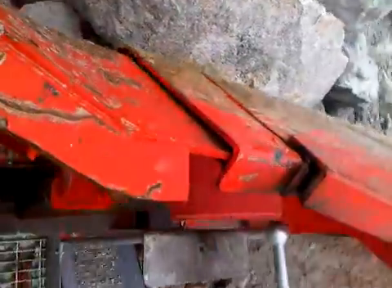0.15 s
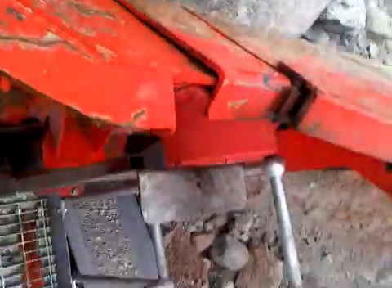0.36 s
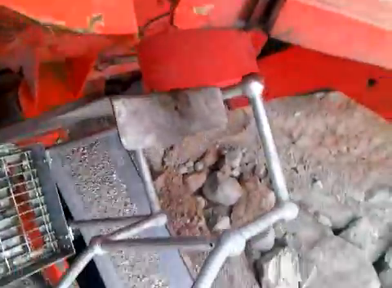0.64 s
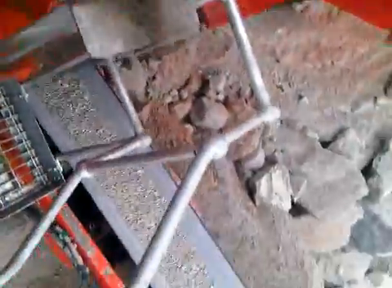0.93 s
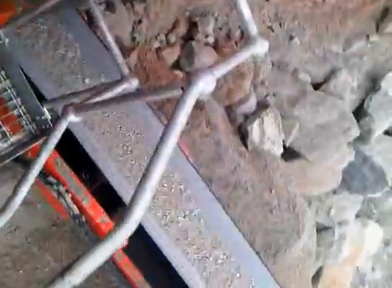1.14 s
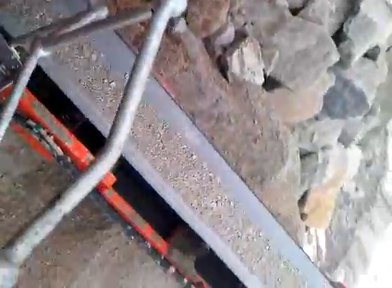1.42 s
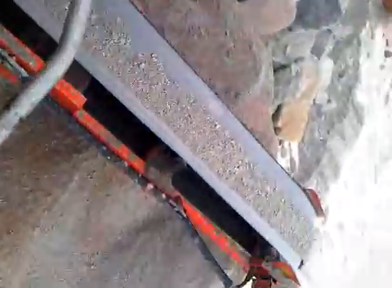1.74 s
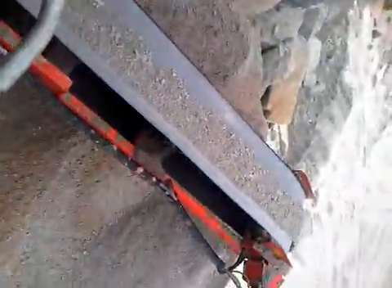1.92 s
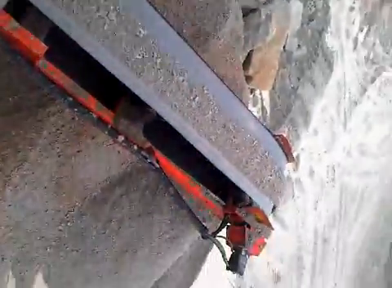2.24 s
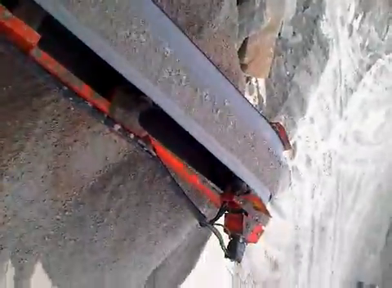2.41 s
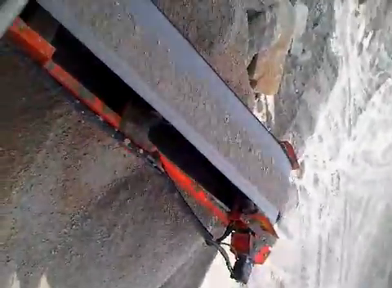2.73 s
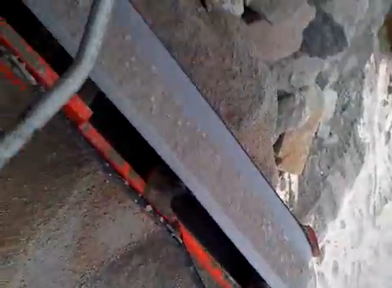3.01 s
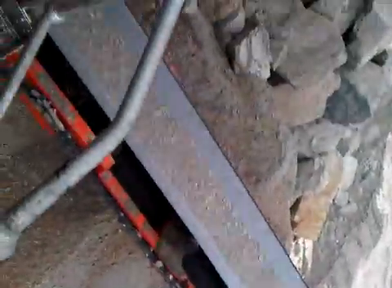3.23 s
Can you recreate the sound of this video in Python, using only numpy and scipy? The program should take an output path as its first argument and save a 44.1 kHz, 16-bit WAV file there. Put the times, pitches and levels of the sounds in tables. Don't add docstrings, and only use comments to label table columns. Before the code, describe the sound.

Loud rock crusher heard from its walkway: crunching blows throughout, strongest early and mid-way, over rough engine drone and belt rattle, which ease slightly as the microphone turns away; dull, clipped, treble-poor sound.

```python
import sys
import numpy as np
from scipy import signal
from scipy.fft import rfft, irfft, next_fast_len
from scipy.io import wavfile
from scipy.ndimage import uniform_filter1d, map_coordinates

SR = 44100
rng = np.random.default_rng(int(sys.argv[2]) if len(sys.argv) > 2 else 0)


def elevation(decibels):
    levels = np.asarray(decibels, float)
    return 10 ** (levels / 20)


def waveform_to_disk(signal):
    frames = np.transpose(np.atleast_2d(signal))
    scaled = np.clip(frames, -1, 1) * 32767
    samples = np.round(scaled).astype(np.int16)
    wavfile.write(sys.argv[1], SR, samples)


N = 148617

# middle in seconds, level in dB, length in seconds, extra grit in dB.
BITES = [(0.054, -16.5, 0.085, 5.5), (0.295, -13.5, 0.068, 1), (0.506, -28.5, 0.28, 17.5),
         (0.715, -22, 0.07, 8.5), (0.943, -13.5, 0.17, -1), (1.16, -17, 0.15, -2), (1.383, -13.5, 0.12, 3),
         (1.585, -9.5, 0.064, -2.5), (1.821, -15, 0.095, -0.5), (2.047, -14.5, 0.16, 0),
         (2.247, -12.5, 0.028, -2), (2.473, -14, 0.1, -6), (2.648, -21, 0.11, -0.5),
         (2.749, -21.5, 0.17, 0), (2.909, -18, 0.079, -2.5), (3.122, -15.5, 0.17, 1),
         (3.328, -11.5, 0.034, -19.5)]
# centre in Hz, width in Hz, level in dB.
FRAME_MODES = [(123, 55, 0.5), (182.8, 53, -0.5), (260.3, 44, -1.5), (367, 42, -0.5), (407, 46, 0),
               (505.5, 48.4, 1.5), (770, 97, -8.5)]
# frequency in Hz, density in dB per Hz.
GRIT_SPECTRUM = [(410, -33), (700, 0), (1620, -7.5), (1880, -10.5), (2060, -13), (2290, -18.5), (6690, -38),
                 (8610, -46), (11200, -69.5), (18900, -120)]
# start in seconds, peak in dB, ring in Hz, T60 in seconds.
THUMPS = [(.055, -11.5, 490, .04), (.096, -13.5, 390, 0.041), (.2755, 0, 520, 0.025),
          (.286, -10, 448, 0.012), (.299, -1.5, 420, .022), (.307, -9, 450, 0.039),
          (.481, -11.5, 474, 0.021), (.675, -8, 347, 0.02), (.712, -9.5, 373, 0.027),
          (.721, -9, 492, 0.031), (.879, -11.5, 420, 0.042), (.915, -18.5, 465, .03),
          (.933, -9.5, 513, .05), (1.16, -3.5, 436, .03), (1.181, -7, 506, .03), (1.372, -1, 480, 0.042),
          (1.391, -9.5, 435, 0.021), (1.4, -11, 422, 0.015), (1.573, -2, 451, .03), (1.595, -8, 506, 0.052),
          (1.809, -8, 505, 0.027), (1.821, -13, 417, 0.036), (1.856, -9, 428, 0.042),
          (1.994, -14, 448, 0.02), (2.011, -6, 493, 0.036), (2.049, -4, 515, 0.045),
          (2.241, -11, 416, 0.022), (2.253, -6, 490, 0.022), (2.469, -16, 433, 0.021),
          (2.49, -12, 426, 0.03), (2.64, -12, 465, 0.017), (2.876, -10.5, 390, 0.048),
          (2.91, -4.5, 447, 0.02), (3.097, -7, 462, .05), (3.128, -9.5, 517, 0.065),
          (3.145, -4.5, 535, 0.049), (3.178, -8, 397, 0.037)]
# start in seconds, peak in dB, ring in Hz.
BOOMS = [(.297, -5.5, 159), (0.541, -10, 244), (.687, -13, 220), (0.991, -9, 172), (1.089, -11.5, 182),
         (1.22, -8, 185), (1.403, -12, 155), (1.576, -12, 197), (1.782, -6, 168), (1.816, -10, 192),
         (2.03, -7.5, 186), (2.449, -12, 182), (2.983, -12.5, 210), (3.218, -4.5, 177)]
# start in seconds, level in dB, T60 in seconds, brightness in dB per octave.
SPLITS = [(.017, -23.5, 0.15, 2.5), (.128, -38.5, 0.32, 6.5), (.156, -40, 0.057, 4),
          (.225, -24.5, 0.13, 4.5), (.275, -27, 0.15, 5.5), (.473, -25, 0.28, 0.5),
          (.536, -23.5, 0.053, -1), (.72, -43.5, 0.067, 4), (.841, -22.5, 0.17, -0.5),
          (.842, -28.5, 0.016, 8), (.848, -30, .015, 9), (.852, -36, .015, 9), (0.932, -38.5, 0.043, 3.5),
          (0.973, -35, .025, 4), (1.009, -35.5, .05, 9.5), (1.033, -39, 0.026, 8.5),
          (1.159, -40, 0.039, 6.5), (1.188, -35, 0.046, 6), (1.352, -24, 0.065, 3.5),
          (1.372, -27.5, 0.073, 6), (1.41, -35, 0.077, 7), (1.072, -31.5, 0.036, -0.5),
          (1.096, -29, .04, 4), (1.57, -30, 0.04, 7), (1.62, -20, 0.05, -2), (1.742, -36, .05, 0),
          (1.82, -34, 0.045, 4), (2.015, -24, 0.11, 0), (2.051, -28.5, 0.16, 4.5), (2.245, -30, 0.046, -9),
          (2.326, -39, 0.03, 4), (2.455, -32.5, 0.06, 5.5), (2.285, -34, 0.033, 8.5), (2.86, -36, .025, 9),
          (2.9, -27.5, 0.074, -1.5), (3.1, -22, 0.11, -5.5), (3.13, -28, 0.061, 6)]
# start in seconds, peak in dB, ring in Hz, T60 in seconds.
CLINKS = [(.058, -19, 1275, .03), (.157, -30, 3820, 0.037), (.158, -40, 5600, .02), (.234, -33, 3270, .03),
          (.235, -42, 6000, .03), (.472, -12, 1115, 0.027), (.486, -18, 1460, 0.035),
          (.508, -18.5, 1340, 0.034), (.84, -23.5, 2567, 0.041), (.841, -26.5, 3910, 0.025),
          (.845, -17, 1394, .04), (.538, -19, 1124, 0.018), (.847, -18.5, 1800, .025),
          (.857, -20, 1290, .03), (1.074, -13.5, 1090, 0.033), (1.095, -35, 3730, 0.068),
          (1.21, -16, 1250, 0.035), (1.268, -32.5, 3750, 0.039), (1.53, -35, 3690, 0.041),
          (2.02, -34, 2500, 0.035), (2.598, -40, 3760, 0.1), (3.082, -34, 2560, 0.039),
          (2.022, -26, 1290, .03), (2.252, -27, 1230, .025), (2.905, -29, 1210, 0.027),
          (3.145, -19.5, 1610, 0.043)]
# middle in seconds, peak in dB.
JOLTS = [
    (.064, -13),
    (.281, -17),
    (.307, -19),
    (1.379, -9),
    (1.579, -19),
    (2.054, -21),
]
# middle in seconds, level in dB, pitch in Hz, length in seconds.
SQUEAKS = [
    (.17, -44.5, 5071, 0.091),
    (0.154, -38.5, 6363, 0.05),
    (0.164, -49, 5900, .06),
    (0.23, -35, 2400, 0.1),
    (.57, -39, 2401, 0.067),
    (1.04, -46, 2402, 0.065),
    (1.87, -47, 2403, 0.077),
    (2.99, -52, 2404, 0.065),
    (3.168, -37.5, 2410, 0.079),
]
# frequency in Hz, density in dB per Hz.
DRONE_SPECTRUM = [(24, -49), (40, -9.5), (81, -5.5), (188, 0), (323, -3), (374, -1.5), (503, -3),
                  (599, -11), (1000, -22), (1300, -45), (2200, -120)]
# multiple of the firing rate, level in dB.
FIRING_ORDERS = [(1, -31), (2, -29), (4, -31.5)]
# frequency in Hz, density in dB per Hz.
RATTLE_SPECTRUM = [(350, -36.5), (600, -6.5), (742, -2.5), (1890, -11), (2290, -21), (3900, -24),
                   (5300, -33), (6700, -33), (8600, -48), (9300, -120)]
# time in seconds, nearness in dB.
FACING = [
    (0.0, -23),
    (0.4, -26.5),
    (0.68, -30),
    (1.25, -27.5),
    (1.8, -28.5),
    (2.699, -30.5),
    (3.37, -28.5),
]
# frequency in Hz, level in dB per bin.
TREBLE_FLOOR = [(4200, -84), (5200, -75), (6600, -77), (7350, -76), (7650, -70), (8000, -72)]
# frequency in Hz, gain in dB.
IMAGE_GAIN = [(8000, 0), (8240, -6), (8480, -14), (8720, -23), (8960, -35), (9200, -51), (9500, -90)]

CRACKS_PER_S, CRACK_SPREAD_DB, GRIT_DB, BODY_DB = 1500, 1, -12, -2
BOOM_T60_S, JOLT_S = 0.054, .004
PINGS_PER_S, PING_HZ, PING_OCTAVES, PING_CYCLES, PING_DB = 120, 1151, .6, 31, -31
FIRING_HZ, WHINE_HZ, WHINE_DB = 93.83, 2401, -52
DRONE_DB, DRONE_FOLLOWS, RATTLE_DB = -17, 0.44, -26.5
CLIP_TOP, CLIP_BOTTOM, CLIP_KNEE = .715, .7, 9
DEBT, DEBT_S, FLICKER_DB = .8, .085, 2.2
FIRST_RATE_HZ = 16000


def unit(x):
    return x / np.sqrt(np.mean(x ** 2) + 1e-20)


def along(points, hz):
    point_hz, value = np.transpose(points)
    return np.interp(np.log(hz + 1), np.log(point_hz + 1), value)


def wobble(rate_hz):
    knots = rng.standard_normal(int(N / SR * 60) + 4)
    return map_coordinates(knots, [np.arange(N) * min(rate_hz, 59) / SR])


def filtered(x, response):
    size = next_fast_len(N + SR // 2)
    return irfft(rfft(x, size) * response(np.fft.rfftfreq(size, 1 / SR)), size)[:N]


def patchy(x, depth_db):
    z = signal.stft(x, nperseg=512)[2]
    field = uniform_filter1d(rng.standard_normal(z.shape), size=6, axis=0)
    field = uniform_filter1d(field, size=7, axis=1)
    return signal.istft(z * elevation(depth_db * unit(field)), nperseg=512)[1][:N]


def pebbles(per_s, spread_db, share):
    hit = rng.random(N) < per_s / SR
    sign = np.sign(rng.standard_normal(N))
    knocks = hit * sign * elevation(spread_db * np.minimum(rng.exponential(1, N), 3))
    share = np.clip(share, 0, 1)
    return np.sqrt(share) * unit(knocks) + np.sqrt(1 - share) * rng.standard_normal(N)


def nearness_db():
    time_s, near_db = np.transpose(FACING)
    return np.interp(np.arange(N) / SR, time_s, near_db - near_db.mean())


def frame_response(hz):
    total = 0
    for k, (centre_hz, width_hz, level_db) in enumerate(FRAME_MODES):
        damping = 1j * hz * width_hz
        total = total + (-1) ** k * elevation(level_db) * damping / (centre_hz ** 2 - hz ** 2 + damping)
    return total


def jaw():
    t = np.arange(N) / SR
    low, high = np.zeros(N), np.zeros(N)
    for middle_s, level_db, length_s, grit_db in BITES:
        swell = elevation(level_db) * np.exp(-8 * ((t - middle_s) / length_s) ** 2)
        low += swell
        high += elevation(grit_db) * swell
    body = unit(filtered(pebbles(CRACKS_PER_S, CRACK_SPREAD_DB, share=0.47), frame_response))
    cracks = pebbles(CRACKS_PER_S, CRACK_SPREAD_DB, share=0.042)
    grit = unit(filtered(cracks, lambda hz: elevation(along(GRIT_SPECTRUM, hz))))
    return elevation(BODY_DB) * low * body + elevation(GRIT_DB + 1.9 * wobble(50)) * high * grit


def struck(rows, blur_hz, attack_s):
    out, t = np.zeros(N + SR), np.arange(SR // 4) / SR
    offsets = rng.standard_normal((len(rows), 2))
    for (start_s, peak_db, ring_hz, t60_s), pair in zip(rows, offsets):
        ring = np.sin(2 * np.pi * ring_hz * t)
        for offset in pair:
            ring += 0.21 * np.sin(2 * np.pi * (ring_hz + blur_hz * offset) * t)
        envelope = elevation(peak_db + 3.5 - 60 * t / t60_s) * (1 - np.exp(-t / attack_s))
        out[round(start_s * SR):][:len(t)] += envelope * ring
    return out[:N]


def thumps():
    return struck(THUMPS, blur_hz=84.0, attack_s=0.0024)


def booms():
    return struck([(*row, BOOM_T60_S) for row in BOOMS], blur_hz=30.7, attack_s=0.002)


def splits():
    out, t = np.zeros(N + SR), np.arange(8192) / SR
    hz = np.fft.rfftfreq(8192, 1 / SR)
    octaves = np.log2(np.minimum(hz + 1, 6400) / 1500)
    noises = rng.standard_normal((len(SPLITS), 8192))
    for (start_s, level_db, t60_s, tilt_db), noise in zip(SPLITS, noises):
        colour = elevation(along(GRIT_SPECTRUM, hz) + tilt_db * octaves)
        envelope = elevation(level_db + 6 - 60 * t / t60_s) * (1 - np.exp(-t / 0.002))
        out[round(start_s * SR):][:len(t)] += envelope * unit(irfft(rfft(noise) * colour))
    return out[:N]


def clinks():
    return struck(CLINKS, blur_hz=69.5, attack_s=0.0016)


def pings():
    rows, t = rng.random((600, 4)), np.arange(2048) / SR
    rows = rows[:min(600, int(PINGS_PER_S * N / SR))]
    hz = PING_HZ * 2 ** (PING_OCTAVES * (4 * rows[:, 1:2] - 2))
    size_db = -12 * rows[:, 2:3] - 7 * np.log2(hz / PING_HZ)
    envelope = elevation(size_db - 60 * t * hz / (2 * PING_CYCLES)) * (1 - np.exp(-t / 0.002))
    rings = envelope * np.sin(2 * np.pi * hz * t)
    at = (rows[:, :1] * N).astype(int) + np.arange(2048)
    return elevation(PING_DB + nearness_db()) * unit(np.bincount(at.ravel(), rings.ravel())[:N])


def jolts():
    t = np.arange(N) / SR
    return sum(elevation(peak_db) * np.exp(-((t - middle_s) / JOLT_S) ** 2) for middle_s, peak_db in JOLTS)


def squeaks():
    out, t = np.zeros(N), np.arange(N) / SR
    for middle_s, level_db, hz, length_s in SQUEAKS:
        swell = np.exp(-8 * ((t - middle_s) / length_s) ** 2)
        out += elevation(level_db) * swell * np.sin(2 * np.pi * hz * t)
    return out


def engine():
    t = np.arange(N) / SR
    noise = patchy(rng.standard_normal(N), depth_db=0.85)
    roar = unit(filtered(noise, lambda hz: elevation(along(DRONE_SPECTRUM, hz))))
    roar_db = DRONE_DB + DRONE_FOLLOWS * nearness_db() + 0.57 * wobble(6.33)
    turn = 2 * np.pi * FIRING_HZ * t + 0.33 * wobble(3.85)
    lines = sum(elevation(db + 1.5 + 0.99 * wobble(5)) * np.sin(k * turn) for k, db in FIRING_ORDERS)
    whine_db = WHINE_DB + nearness_db() + 1 + 4 * wobble(7)
    whine = elevation(whine_db) * np.sin(2 * np.pi * WHINE_HZ * t + wobble(20))
    return elevation(roar_db) * roar + lines + whine


def conveyor():
    gravel = patchy(pebbles(2500, spread_db=3.0, share=0.35), depth_db=1.5)
    rattle = unit(filtered(gravel, lambda hz: elevation(along(RATTLE_SPECTRUM, hz))))
    return elevation(RATTLE_DB + nearness_db() + 1.1 * wobble(16) + 0.46 * wobble(40)) * rattle


def scene():
    stones = thumps() + booms() + splits() + clinks() + pings()
    plant = jaw() + stones + squeaks() + engine() + conveyor()
    plant = filtered(plant, lambda hz: 1 / (1 + (65 / (hz + 1)) ** 5))
    return (plant + filtered(jolts(), lambda hz: hz / (hz + 8)))[None]


def overloaded(x):
    top = np.where(x > 0, CLIP_TOP, CLIP_BOTTOM)
    return x / (1 + np.abs(x / top) ** CLIP_KNEE) ** (1 / CLIP_KNEE)


def starved(x):
    hz, _, z = signal.stft(x, SR, nperseg=1024)
    power = uniform_filter1d(np.abs(z) ** 2, size=2, axis=0)
    spent_db = 10 * np.log10(uniform_filter1d(power[hz > 2000].sum(axis=0), size=6))
    frames = np.arange(len(spent_db))
    spent_db = spent_db - uniform_filter1d(spent_db, size=200)
    late_db = np.interp(frames - DEBT_S * SR / 512, frames, spent_db) - .5 * spent_db
    flicker_share = np.clip(hz / 1000 - 6.5, .2, 1)[:, None]
    flicker_db = FLICKER_DB * rng.standard_normal(len(frames)) * flicker_share
    floor_db = along(TREBLE_FLOOR, hz)[:, None] + DEBT * late_db + flicker_db
    keep = (10 * np.log10(np.abs(power) + 1e-20) > floor_db) | (hz < 4200)[:, None]
    return signal.istft(z * keep, SR, nperseg=1024)[1][:N]


def resampled(x):
    half_hz = FIRST_RATE_HZ / 2
    band = filtered(x, lambda hz: np.clip((half_hz - hz) / 150, 0, 1))
    mirror = 2 * band * np.cos(2 * np.pi * FIRST_RATE_HZ * np.arange(N) / SR)
    return band + filtered(mirror, lambda hz: (hz >= half_hz) * elevation(along(IMAGE_GAIN, hz)))


def top_cut(x):
    return signal.sosfilt(signal.butter(12, 9216, fs=SR, output="sos"), x)


def record(dry):
    mix = resampled(starved(overloaded(dry[0])))
    return top_cut(mix[None])


dry = scene()
out = record(dry)
waveform_to_disk(out)
```